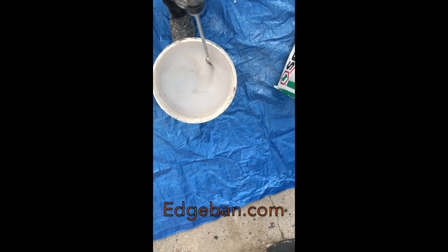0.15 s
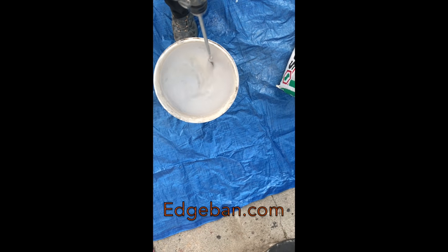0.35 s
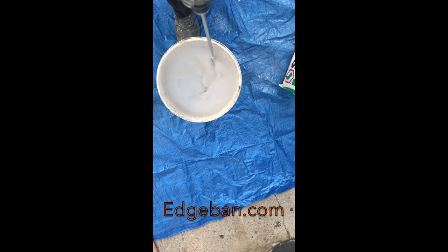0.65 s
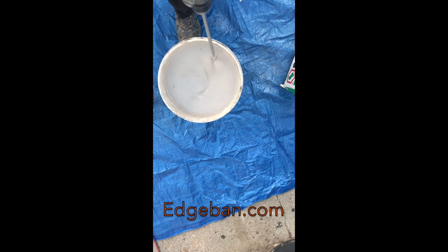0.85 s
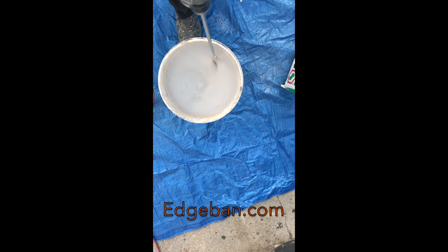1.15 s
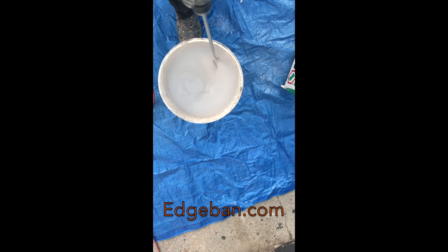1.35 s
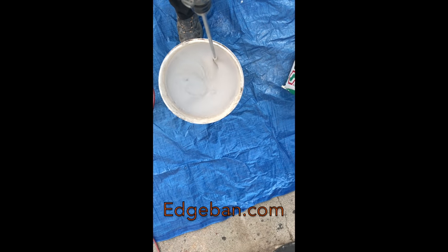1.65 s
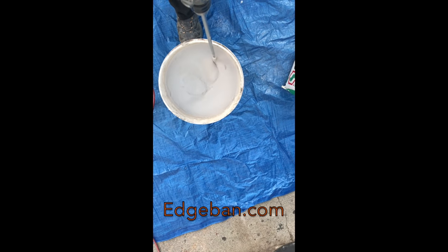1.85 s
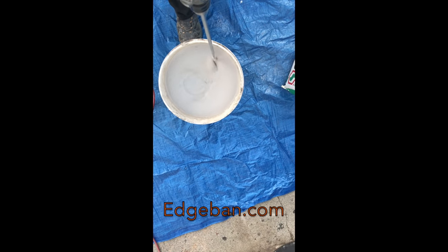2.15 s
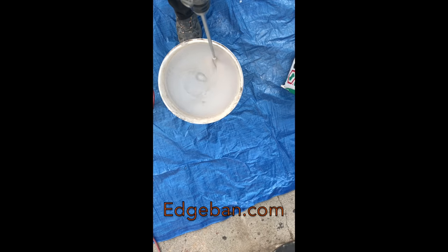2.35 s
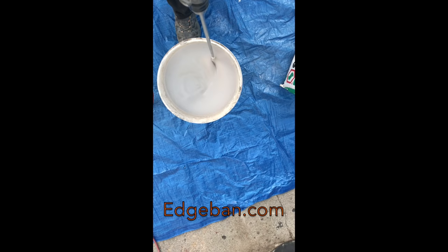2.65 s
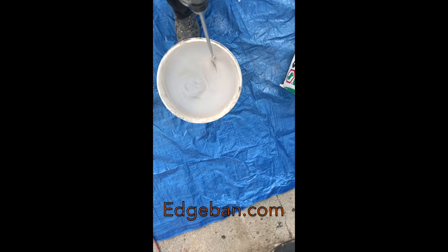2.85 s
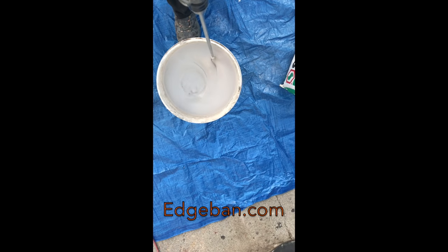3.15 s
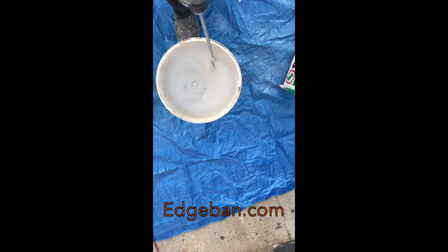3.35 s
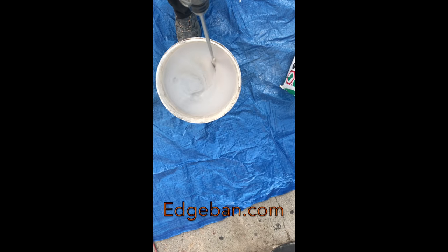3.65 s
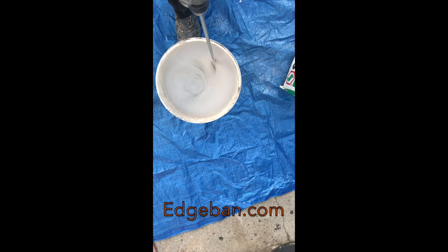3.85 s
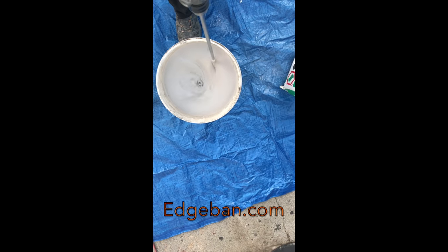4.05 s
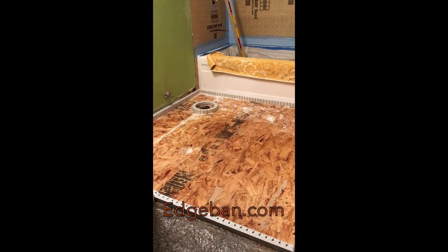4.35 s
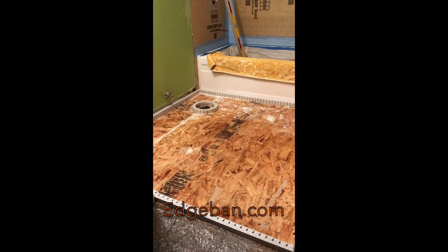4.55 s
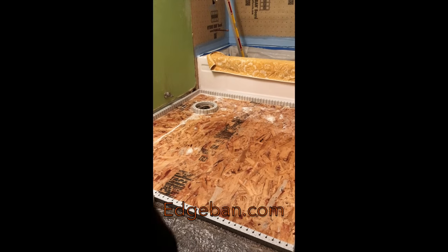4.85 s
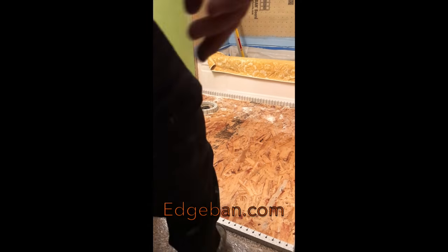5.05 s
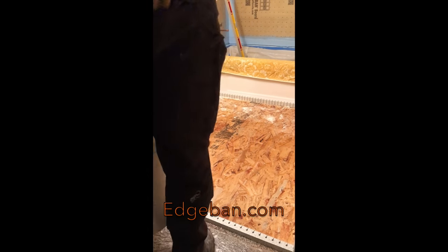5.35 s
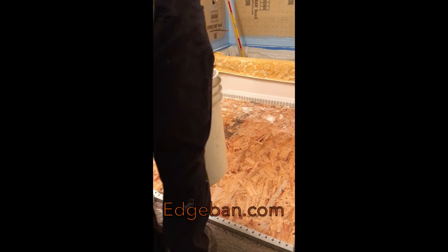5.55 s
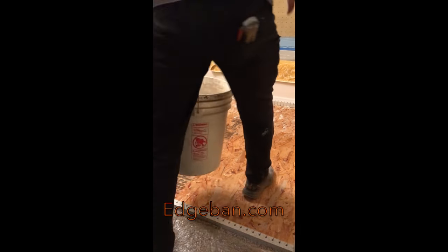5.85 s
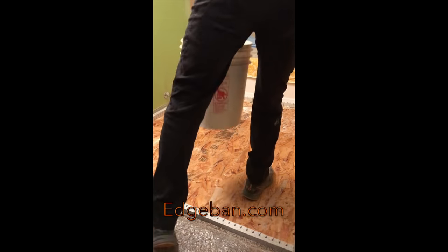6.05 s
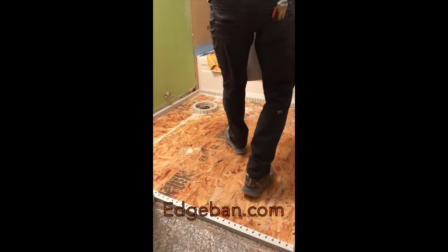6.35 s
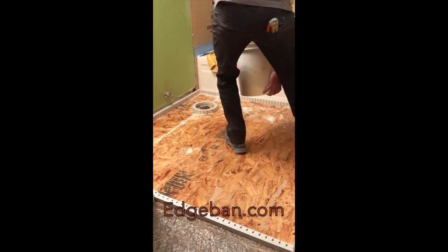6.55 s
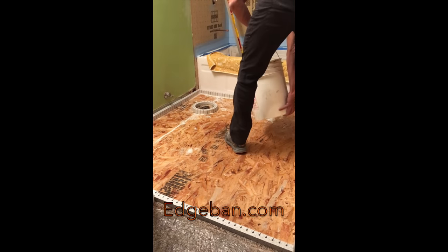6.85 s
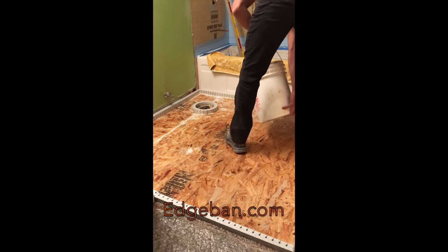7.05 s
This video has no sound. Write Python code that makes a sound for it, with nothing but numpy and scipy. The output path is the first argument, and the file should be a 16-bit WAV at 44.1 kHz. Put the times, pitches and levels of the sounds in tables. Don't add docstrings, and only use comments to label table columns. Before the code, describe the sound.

From 0 to about 4.3 seconds a mains drill mixing thick material roars outdoors, loud, dry and close: broad bright fan and brush noise, buzzing motor tones and a piercing whine near 15 kHz. Its pitch sags slightly in the first second, with a faint paddle-rate wobble that eases. It cuts instantly to a far quieter small bare room with low hum. A sharp snap at 4.4 comes among quick, scratchy handle squeaks until 4.6. Ticks and knocks follow at 4.7-5.0, with a faint thin whistle near 5.0. A hard boot step lands at 5.2; dense squeaks and cloth swishes run from 5.3 to 6.35, with a heavy low footfall at 5.9. Softer thuds and ticks come at 6.4-6.7. Very faint pail creaks close at 6.9-7.2. Short room reflections, one phone microphone.

```python
import sys
import numpy as np
from scipy import signal
from scipy.fft import rfft, irfft
from scipy.io import wavfile
from scipy.ndimage import uniform_filter1d

SR = 44100
rng = np.random.default_rng(int(sys.argv[2]) if len(sys.argv) > 2 else 0)


def gain_from_decibels(decibels):
    exponent = np.asarray(decibels, float) / 20
    return 10 ** exponent


def master_out(mix):
    frames = np.transpose(np.atleast_2d(mix))
    ceiling = np.clip(frames, -1, 1)
    pcm = np.round(ceiling * 32767).astype(np.int16)
    wavfile.write(sys.argv[1], SR, pcm)


N = 317958
CUT_S = 4.3303


def evened(x):
    return x / np.sqrt(np.mean(x ** 2) + 1e-20)


def read(points, hz):
    f, value = np.transpose(points)
    return np.interp(np.log(hz + 1), np.log(f + 1), value)


def add(mix, s, sound):
    part = mix[round(s * SR):][:len(sound)]
    part += sound[:len(part)]


def drift(count, size):
    return evened(uniform_filter1d(uniform_filter1d(rng.standard_normal(count), size), size))


def wash(spectrum, modes, patchy_db):
    frames, hz = N // 512 + 5, np.fft.rfftfreq(2048, 1 / SR)
    real, imag, patches = rng.standard_normal((frames, 1025, 3)).T
    patches = uniform_filter1d(patches, size=20, axis=0)
    patches = evened(uniform_filter1d(patches, size=8, axis=1))
    shape_db = read(spectrum, hz)
    for centre_hz, width_hz, db in modes:
        shape_db = shape_db + db / (1 + ((hz - centre_hz) / (width_hz / 2)) ** 2)
    z = (real + 1j * imag) * gain_from_decibels(shape_db[:, None] + patchy_db * patches)
    return evened(signal.istft(z, nperseg=2048, noverlap=1536)[1][:N])


# (time [s], level [dB])
DRILL = [
    (0.0, -20.5),
    (0.36, -21),
    (4.32, -21),
]
# (time [s], frequency [Hz])
WHINE = [(0.0, 15165), (0.2, 15174), (0.36, 15080), (0.65, 15004), (0.9, 15004), (1.12, 14973),
         (1.5, 15010), (1.72, 15028), (2.22, 14984), (2.7, 15013), (3.08, 14974), (3.5, 14979),
         (3.7, 15002), (3.92, 14995), (4.33, 15023)]
# (time [s], rate [turns/s], speed sag [share])
PADDLE = [
    (0, 9.3, .0009),
    (1.3, 9.3, .0008),
    (1.8, 9.3, .0003),
    (4.32, 9.3, .0002),
]
# (multiple [-], level re roar [dB])
TEETH = [(1, -30), (2, -24), (3, -28), (4, -23), (5, -15.5), (5.6, -25), (6, -18), (9, -29), (12, -22),
         (14, -28), (21, -31), (22, -24), (23, -23), (24, -19.5), (25, -28), (30, -31), (38, -28),
         (39, -10.5)]
# (frequency [Hz], density [dB/Hz])
ROAR = [(18, -61), (30, -24), (71, -17), (225, -17), (381, -12.5), (457, -14.5), (772, -5.5), (1240, -7.5),
        (1980, -3), (4020, -5), (7540, -8), (9060, -5), (10300, -3.5), (14500, -6), (15700, -21.5)]
# (centre [Hz], width [Hz], gain [dB])
HOUSING = [(85, 43, 1.5), (140, 25, -11.5), (950, 116, 5), (2136, 180, 5.5), (2997, 500, 5.5),
           (1600, 340, 4.5), (2250, 84, 1.5), (4600, 250, 4), (7710, 300, -6.5), (8320, 3600, 5),
           (10370, 1000, -8.5), (12900, 440, -2), (13700, 1600, 4)]


def drill():
    t = np.arange(N) / SR
    s, paddle_hz, sag = np.transpose(PADDLE)
    bite = np.cumsum(np.interp(t, s, paddle_hz)) / SR % 1
    speed_hz = np.interp(t, *np.transpose(WHINE)) / 39 * (1 + np.interp(t, s, sag) * (2 * bite - 1))
    turns = np.cumsum(speed_hz * (1 + .0003 * drift(count=N, size=1500))) / SR
    roar = wash(ROAR[:-1], HOUSING, patchy_db=.6) * (1 + .035 * np.cos(2 * np.pi * turns))
    roar *= gain_from_decibels(0.45 * drift(count=N, size=800))
    orders = np.zeros(N)
    for k, db in TEETH:
        waver = gain_from_decibels(db + 0.84 * drift(count=N, size=2000))
        orders += waver * np.cos(2 * np.pi * (k * turns + rng.random()))
    return gain_from_decibels(np.interp(t, *np.transpose(DRILL))) * (roar + np.sqrt(2) * orders)


# (frequency [Hz], density [dB/Hz])
HUM = [(18, -68), (30, -29.5), (152, 2), (244, -8.5), (271, -27), (325, -7), (469, -14), (521, -11),
       (626, -6.5), (695, -12), (1450, -16.5), (4960, -30.5), (15700, -46)]
# (centre [Hz], width [Hz], gain [dB])
HUM_MODES = [(161, 43, -6.5), (239.4, 14, 6), (326, 33, 11.5), (464, 39, 16), (632.4, 21, 11),
             (1030, 1200, -5.5), (1530, 30, 0), (2080, 2400, 7)]


def hum():
    return gain_from_decibels(-52) * wash(HUM, HUM_MODES, patchy_db=0.5)


# (frequency [Hz], density [dB/Hz])
RUSTLE_COLOUR = [(800, -11), (2000, 1), (4000, 4), (8000, 2.5), (12000, 1.5), (15500, 1)]
# (peak time [s], level [dB], length [s])
SWISHES = [(4.436, -52, .05), (4.537, -50, 0.063), (4.794, -52, .09), (4.967, -53.5, 0.15),
           (5.194, -45, 0.024), (5.172, -51.5, .08), (5.32, -55, .06), (5.43, -54, .06),
           (5.573, -48.5, .14), (5.7, -56, .06), (5.82, -54, .05), (5.902, -44.5, 0.053),
           (6.05, -54.5, 0.41), (6.28, -56, 0.055), (6.498, -60, .15), (6.733, -62, 0.18)]


def rustle():
    still_db, fall_db, rise_share = -72, -10, 0.47
    t = np.arange(0, N + 64, 64) / SR
    power = gain_from_decibels(2 * still_db)
    for s, db, length in SWISHES:
        lengths_off = np.maximum((t - s) / length, (s - t) / (rise_share * length))
        power = power + gain_from_decibels(2 * (db + fall_db * lengths_off))
    level = np.interp(np.arange(N) / SR, t, np.sqrt(power))
    return level * wash(RUSTLE_COLOUR, [], patchy_db=-1.0) * gain_from_decibels(1.3 * drift(count=N, size=60))


# (frequency [Hz], gain [dB])
WIRE = [(2900, -15.5), (3500, -4.5), (4300, -2), (5800, 7), (8000, -3), (9700, -9), (10500, 2.5),
        (11600, -13)]


def squeak(s, length, first_hz, settled_hz, level_db):
    settle_s, fade_db = .005, -2
    t = np.arange(0, min(length, .09), 1 / SR)
    fast, slow, hold, uneven = (drift(count=4096, size=n)[:len(t)] for n in (16, 50, 50, 34))
    grit = rng.standard_normal(4096)[:len(t)]
    slip_hz = settled_hz + (first_hz - settled_hz) * np.exp(-t / settle_s)
    turns = np.cumsum(slip_hz * (1 + .032 * fast + .014 * slow)) / SR
    grip = gain_from_decibels(level_db + fade_db * t / length + 3.8 * hold)
    chatter = .75 + .65 * uneven
    tone = chatter * gain_from_decibels(read(WIRE, slip_hz)) * np.cos(2 * np.pi * turns)
    for k, db in ((2, -8.5), (3, -8)):
        tone += gain_from_decibels(db + read(WIRE, k * slip_hz)) * np.cos(2 * np.pi * k * turns)
    rasp = signal.lfilter(*signal.butter(2, [2600, 9000], "band", fs=SR), grit)
    scrape = gain_from_decibels(-8) * tone.std() * rasp
    return s, 1.4 * grip * (tone + scrape) * signal.windows.tukey(len(t), .5)


# (time [s], length [s], first slip [Hz], settled slip [Hz], level [dB])
SQUEAKS = [(4.334, 0.033, 3540, 3200, -48), (4.338, 0.015, 4300, 4600, -44),
           (4.377, 0.021, 4700, 4600, -46), (4.383, 0.033, 4600, 4500, -38.5),
           (4.439, 0.035, 4400, 4600, -39), (4.514, 0.036, 4780, 4500, -39.5),
           (4.564, .02, 4500, 4530, -54), (5.303, 0.064, 6400, 5900, -66),
           (5.308, 0.028, 4100, 3900, -41.5), (5.32, 0.037, 3650, 3070, -47),
           (5.346, 0.069, 4400, 4660, -54), (5.414, 0.037, 3340, 2804, -40),
           (5.408, 0.039, 4000, 3630, -43.5), (5.494, .024, 4290, 4360, -42),
           (5.512, 0.028, 4600, 4900, -45), (5.529, 0.048, 3600, 2890, -39), (5.537, .065, 3540, 3480, -46),
           (5.563, 0.045, 4340, 4970, -52), (5.644, 0.052, 4370, 4150, -46.5),
           (5.665, 0.039, 3060, 3407, -41),
           (5.754, 0.013, 5740, 5100, -47.5), (5.795, 0.018, 3460, 2820, -38.5),
                  (5.806, .03, 3500, 3450, -40.5), (5.887, .018, 3400, 3320, -46),
                  (5.894, 0.11, 3520, 3360, -53), (5.898, 0.019, 3090, 2950, -40.5),
                  (5.902, 0.032, 4080, 3900, -46), (6.02, 0.017, 5500, 4050, -50),
                  (6.027, .025, 3300, 2950, -47.5), (6.047, 0.02, 3380, 4100, -47),
                  (6.084, 0.031, 3950, 4980, -47), (6.154, .04, 4340, 3860, -50),
                  (6.21, .012, 3650, 3440, -46), (6.215, 0.03, 3280, 3000, -37),
                  (6.238, .024, 3630, 3870, -44), (6.289, 0.013, 2930, 3080, -42),
                  (6.295, 0.027, 3360, 3500, -45.5), (6.307, 0.04, 3710, 3860, -50)]


def wire_handle():
    handle = np.zeros(N)
    for row in SQUEAKS:
        add(handle, *squeak(*row))
    return signal.sosfilt(signal.butter(6, 2650, "high", fs=SR, output="sos"), handle)


def knock(s, level_db, hz, t60, octaves, rise_share):
    t, f, rise = np.arange(16384) / SR, np.fft.rfftfreq(16384, 1 / SR), rise_share * t60
    bell = np.exp(-(np.log2((f + 1) / hz) / octaves) ** 2)
    band = irfft(rfft(rng.standard_normal(16384)) * bell)
    shape = np.minimum(t / rise, 1) ** 2 * gain_from_decibels(-60 * np.maximum(t - rise, 0) / t60)
    return s, gain_from_decibels(level_db) * np.sqrt(np.mean(shape ** 2)) * evened(band * shape)


# (time [s], level [dB], centre [Hz], t60 [s])
SNAPS = [
    (4.4251, -19, 9000, 0.0067),
    (5.615, -43, 2500, 0.2),
]
# (time [s], level [dB], centre [Hz], t60 [s])
TICKS = [
    (4.696, -64, 9050, 0.074),
    (4.733, -48, 4970, 0.068),
    (4.783, -46, 3900, 0.076),
    (4.806, -36, 6000, 0.031),
    (4.959, -43, 4400, 0.072),
    (5.315, -52, 9000, .06),
    (6.638, -52, 2500, .05),
    (6.726, -58, 6000, .05),
]
# (time [s], level [dB], centre [Hz], t60 [s])
TOCKS = [
    (4.426, -39, 2200, .11),
    (5.901, -39, 410, .1),
    (4.81, -41, 2500, .08),
    (4.826, -38.5, 2150, .13),
    (4.958, -33.5, 1770, .06),
    (4.958, -44, 796, .062),
    (5.7, -45, 2530, .03),
    (4.735, -46, 2900, .09),
    (6.489, -44, 180, .08),
]
# (time [s], level [dB], centre [Hz], t60 [s])
THUDS = [
    (5.191, -43, 1370, 0.09),
    (5.899, -36, 140, 0.085),
    (6.4, -51, 178, 0.19),
    (6.638, -44, 300, .06),
]


def boots_and_knocks():
    boots = np.zeros(N)
    kinds = [(SNAPS, 2.1, 0.032), (TICKS, 1.1, .025), (TOCKS, 0.63, 0.026), (THUDS, 1.35, 0.074)]
    for rows, octaves, rise_share in kinds:
        for row in rows:
            add(boots, *knock(*row, octaves, rise_share))
    return boots


# (frequency [Hz], gain [dB])
PAIL = [(4600, -7), (4880, -1), (5200, -8), (5500, -1), (5720, -10), (6200, -9), (6550, -6), (7300, -18)]


def creak(s, length, first_hz, last_hz, level_db, multiples):
    slip_hz = np.linspace(first_hz, last_hz, round(min(length, .18) * SR))
    count = len(slip_hz)
    turns = np.cumsum(slip_hz * (1 + 0.003 * drift(count=8192, size=100)[:count])) / SR
    tone = sum(gain_from_decibels(read(PAIL, k * slip_hz)) * np.cos(2 * np.pi * k * turns) for k in multiples)
    grip = gain_from_decibels(level_db + 2.0 * drift(count=8192, size=300)[:count])
    return s, grip * tone * signal.windows.tukey(count, .35)


# (time [s], length [s], first [Hz], last [Hz], level [dB])
WHISTLE = [
    (4.86, .07, 6550, 6550, -63),
    (5.04, .11, 6520, 6550, -58),
]
# (time [s], length [s], first slip [Hz], last slip [Hz], level [dB])
CREAKS = [
    (6.942, .06, 815, 813, -63),
    (6.995, .045, 812, 808, -67),
    (7.028, .05, 806, 765, -66),
    (7.15, .022, 760, 778, -66),
    (7.163, .042, 782, 787, -62),
]
CREAK_MULTIPLES = (6, 7, 8, 9)


def loaded_pail():
    pail = np.zeros(N)
    for row in WHISTLE:
        add(pail, *creak(*row, [1]))
    for row in CREAKS:
        add(pail, *creak(*row, CREAK_MULTIPLES))
    return pail


# (frequency [Hz], t60 [s])
ROOM_T60 = [(200, 0.43), (2000, 0.18), (6000, 0.25), (14000, 0.13)]


def room(x):
    taps = np.zeros(SR // 2)
    at = np.arange(60, SR // 2 - 10, 10)
    taps[at + rng.integers(0, 10, len(at))] = rng.choice([-1., 1.], len(at))
    hz, t, z = signal.stft(taps, SR, nperseg=128)
    decay = gain_from_decibels(-60 * t / read(ROOM_T60, hz)[:, None])
    tail = signal.istft(z * decay, SR, nperseg=128)[1]
    return signal.fftconvolve(x, tail / np.linalg.norm(tail))[:N]


def indoors():
    handle = wire_handle()
    struck = boots_and_knocks() + loaded_pail()
    reflected = gain_from_decibels(0.5) * room(handle) + gain_from_decibels(-9) * room(struck)
    return gain_from_decibels(-1) * handle + struck + reflected + rustle() + hum()


def scene():
    after = np.arange(N) / SR - CUT_S
    mono = drill() * np.clip(-after / .0004, 0, 1) + indoors() * np.clip(after / .008, 0, 1)
    return np.array([mono, mono])


def side_patches(mono):
    count, low_hz, top_hz, wide_hz = 36, 4100, 13500, 1400
    side, hz = np.zeros(N), np.fft.rfftfreq(2048, 1 / SR)
    for when, where in rng.random((count, 2)):
        start = 476 + 1024 * int(when * (N // 1024 - 3))
        from_hz = low_hz + where ** 1.53 * (top_hz - low_hz)
        band = (hz > from_hz) & (hz < from_hz + wide_hz)
        level = irfft(rfft(mono[start:start + 2048]) * band).std()
        noise = evened(irfft(rfft(rng.standard_normal(2048)) * band))
        add(side, start / SR, gain_from_decibels(-8.0) * level * noise * signal.windows.tukey(2048, .7))
    return side


def band_limit(x):
    return signal.sosfilt(signal.butter(12, 16580, fs=SR, output="sos"), x)


def record(dry):
    thin = signal.sosfilt(signal.butter(3, 50, "high", fs=SR, output="sos"), dry)
    edge = signal.firwin(2047, 15750, window=("kaiser", 9), fs=SR)
    limited = signal.oaconvolve(thin, edge[None], "same")
    mix = limited + side_patches(limited[0]) * np.array([[1], [-1]])
    return band_limit(mix)


dry = scene()
out = record(dry)
master_out(out)
```